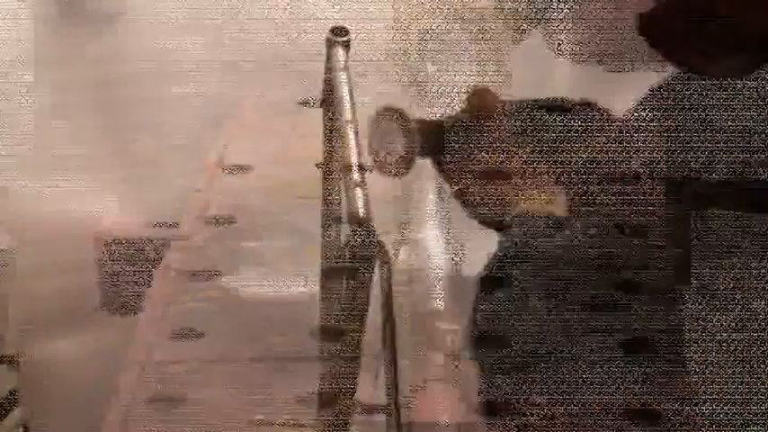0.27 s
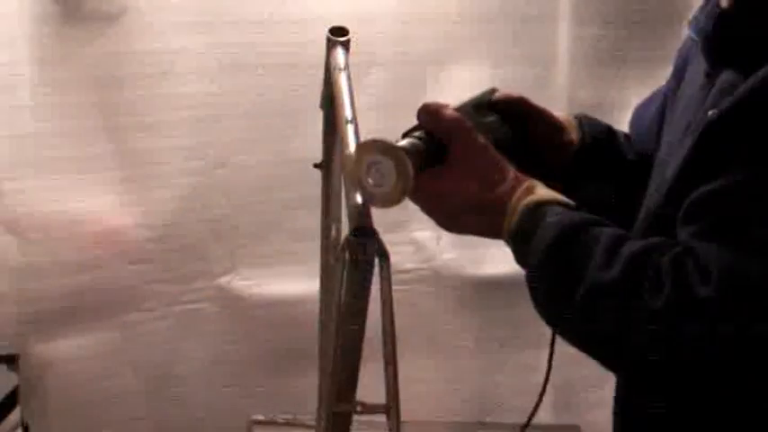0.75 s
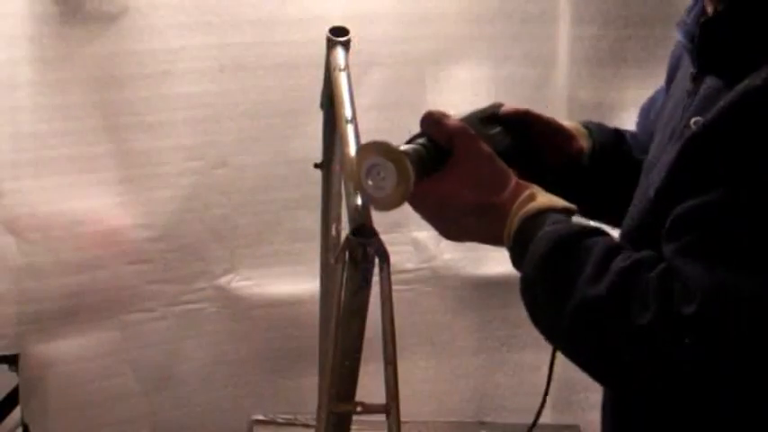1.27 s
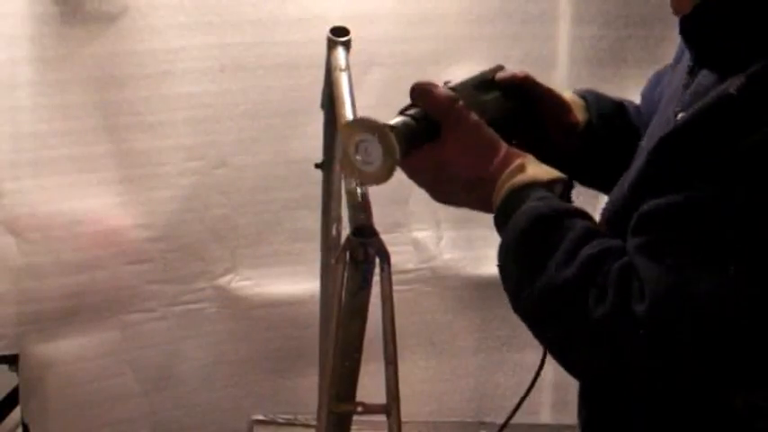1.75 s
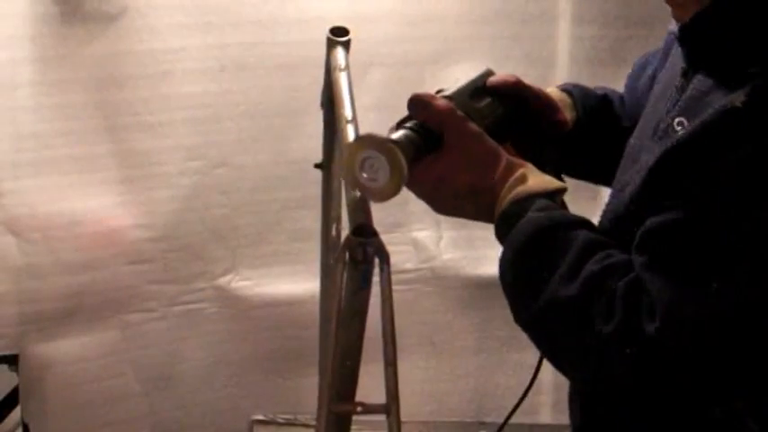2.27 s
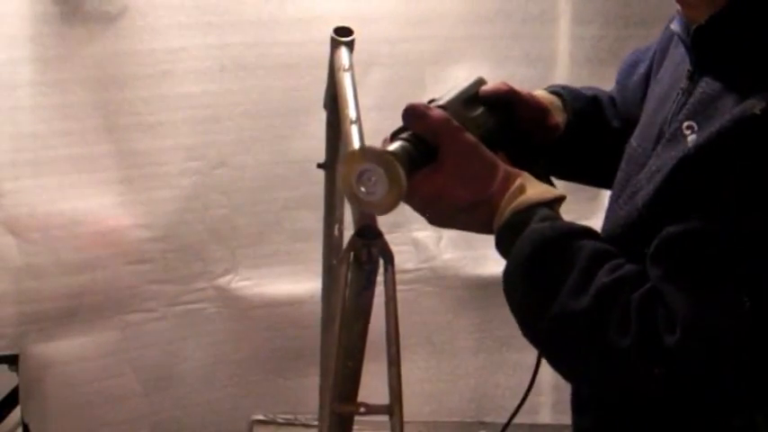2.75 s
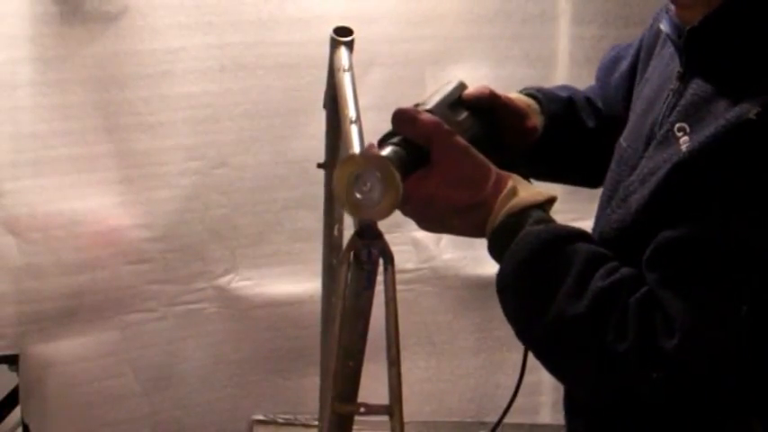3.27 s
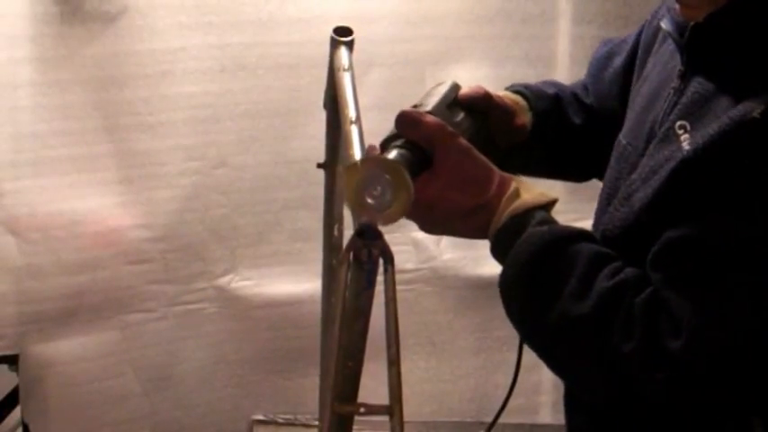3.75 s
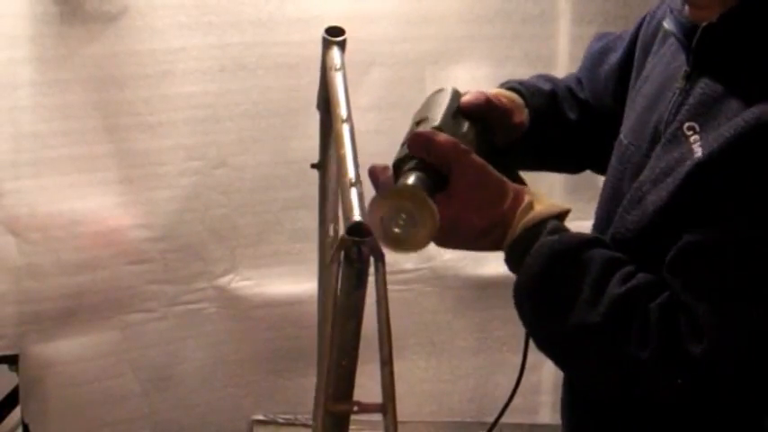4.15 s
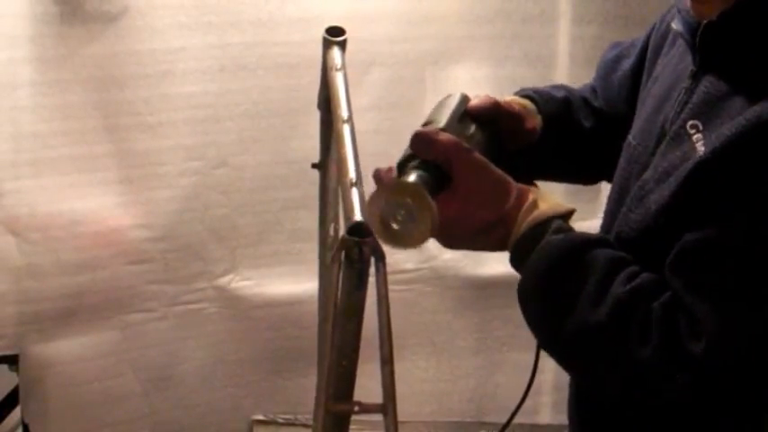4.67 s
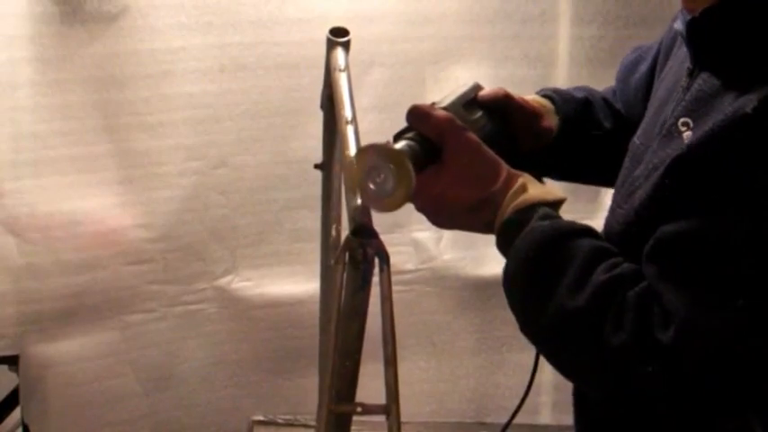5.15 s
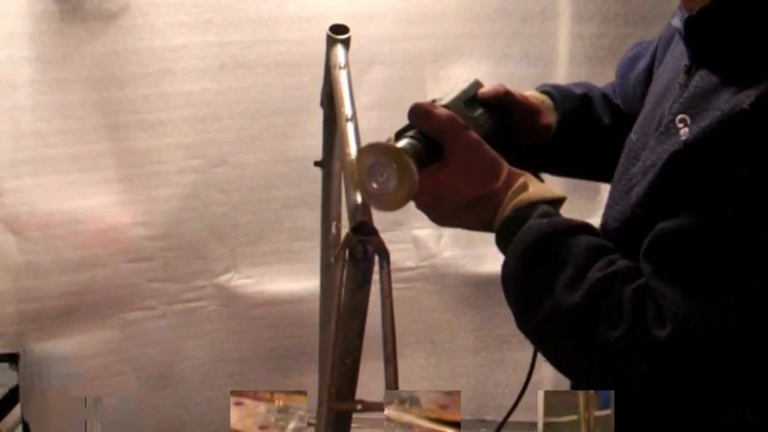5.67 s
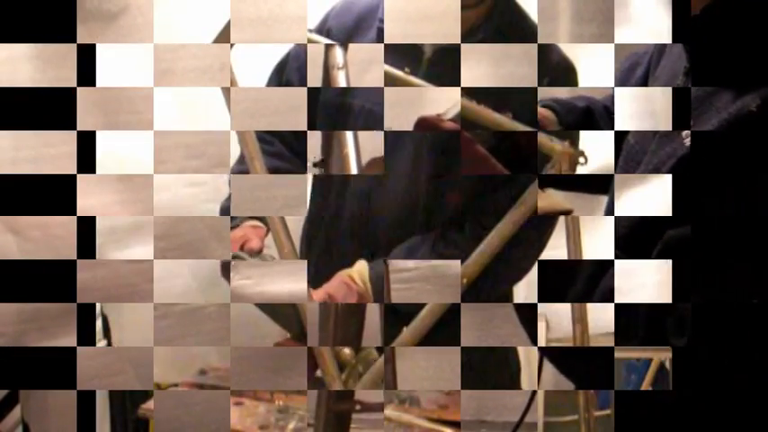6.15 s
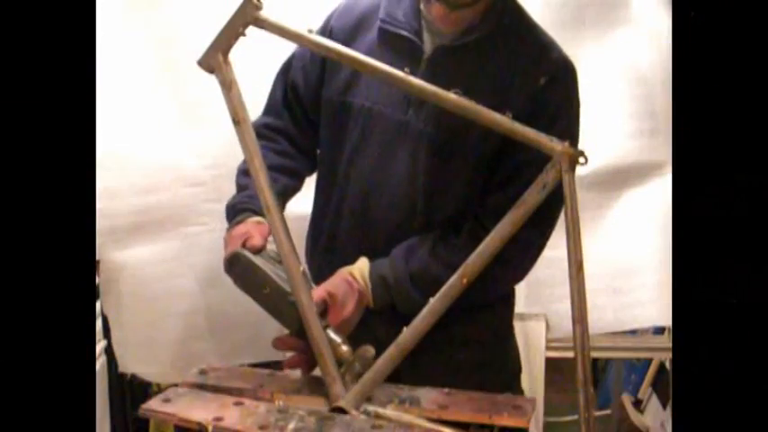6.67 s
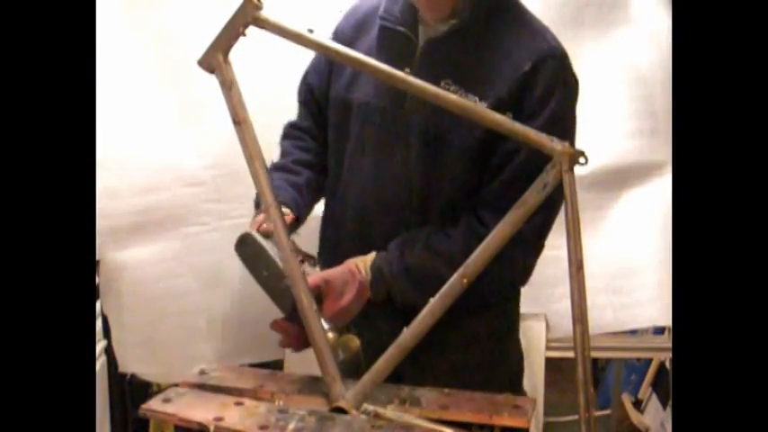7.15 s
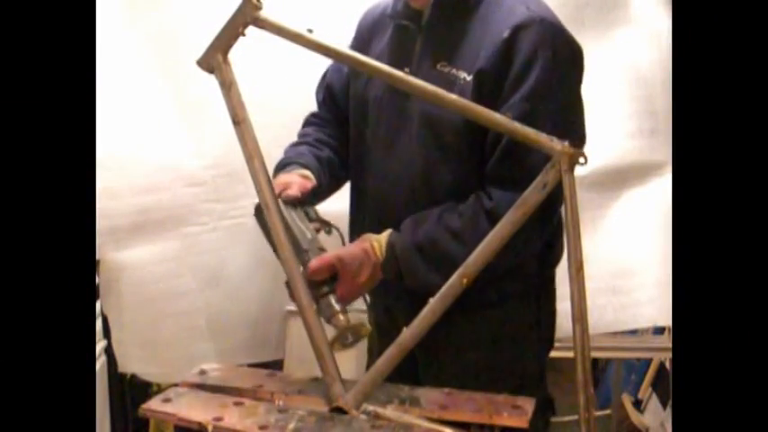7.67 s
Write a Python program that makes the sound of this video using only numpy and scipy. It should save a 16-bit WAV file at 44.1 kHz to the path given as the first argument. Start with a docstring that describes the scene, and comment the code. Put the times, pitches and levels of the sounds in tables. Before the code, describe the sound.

Stereo, fairly close, in a garage: an electric drill drives a wire wheel over thin hollow steel tubes. From 0 s a steady whine near 1.7 kHz with bristle hiss fades almost to silence by 0.65 s. At about 0.67 s a louder stretch springs in abruptly, whine slightly higher, around 1.8 kHz, with strong bright hiss, hollow mid rumble and short tube resonances. From 2.2 s load drags the pitch down, the main whine growing stronger, to its lowest near 3.5 s, about 1.5 kHz; it climbs back partway by 4.5 s and wavers, with roughness, wheel beating and thin high ringing. Between 5.7 and 6.6 s it melts into another pass, two close whines beating. The new tube sounds fuller and drier; pitch rises after 6.7 s, the wheel digs in with a surge at 7.4-7.6 s, then sags, still running at 7.9 s.

```python
"""A drill's whine and the hiss of a wire wheel on thin steel tubes come first, sinking within the first second.
A second stretch springs in abruptly and later melts into a third. The gearbox whines at multiples of the motor
speed; load bends the pitch through resonances of casing and garage, so each line swells and drops.
Bristles hiss and make the frame rumble; ringing bands of tube, frame and garage swell during their spells.
Gain control ducks the loud moments, and all of it shares one upper band limit."""
import sys
import numpy as np
from scipy import signal
from scipy.fft import rfft, irfft, next_fast_len
from scipy.io import wavfile
from scipy.ndimage import uniform_filter1d

SR = 44100
rng = np.random.default_rng(int(sys.argv[2]) if len(sys.argv) > 2 else 0)


def waveform_to_disk(signal):
    """Save audio, clipped to [-1, 1], as 16-bit WAV at the path in sys.argv[1]."""
    frames = np.transpose(np.atleast_2d(signal))
    scaled = np.clip(frames, -1, 1) * 32767
    samples = np.round(scaled).astype(np.int16)
    wavfile.write(sys.argv[1], SR, samples)


N = 348831

# All source levels are set ahead of gain control and fades.
CUT_S, BLEND_S = .665, (5.7, 6.6)  # second stretch starts; second melts into third
WHEEL_RATIO = 4 / 39  # wheel turns per motor turn: four pinion teeth drive a larger gear
RIGHT_LAG_S = 6e-5  # sound reaches the left microphone port first

# How loud each gearbox line arrives at a given motor speed, one table a stretch: speed_turns_per_s,
# mesh_db (at 4 x motor), then first_db, third_db, fifth_db, eighth_db (at 1, 3, 5 and 8 x motor)
FIRST_LINES = [(432.6, -25, -45, -54, -37, -34), (433.8, -28, -50, -55, -34, -45),
               (434.3, -38, -55, -56, -42, -50), (437, -38, -55, -50, -42, -49),
               (437.8, -31, -55, -45, -40, -48)]
SECOND_LINES = [(383.4, -17.5, -37.5, -34, -26, -34), (385.5, -21, -37, -31, -34, -31),
                (389.3, -24, -40.5, -33.5, -33.5, -28), (395.8, -21.5, -41, -27, -28, -32.5),
                (396, -29, -46, -37, -35, -38), (399, -17.5, -54, -40, -37, -31),
                (402.8, -14, -47, -36, -34.5, -38), (408.2, -17, -42, -34, -39, -26),
                (409, -25, -35.5, -36, -45, -28.5), (415.5, -24, -39, -38, -56, -34.5),
                (418.2, -18.5, -38, -31, -36.5, -37.5), (423, -25.5, -42, -28, -31, -31),
                (429, -28, -43, -28, -34, -39), (434, -21.5, -44, -26.5, -30, -36),
                (440, -31, -45, -30, -30, -31), (452.5, -36, -39.5, -49, -40, -38),
                (453.5, -54, -41.5, -36.5, -38.5, -56)]
THIRD_LINES = [(405.5, -24.5, -46, -42, -35, -41), (406.3, -22, -50, -32, -31, -42),
               (414, -26, -43, -30, -37, -37), (414.8, -27.5, -51, -36, -27.5, -33),
               (419.4, -26, -55, -28.5, -40, -37), (422, -32, -58, -36, -33, -33),
               (424, -28.5, -56, -36, -36.5, -38)]
# Wheel run-out beating against the mesh, in the first two stretches and in the third:
# time_s, below_db, above_db (lines one wheel turn either side of the mesh)
EARLY_RUNOUT = [(0, -37, -38), (.7, -52, -52), (2.2, -44, -45), (2.7, -30, -34), (3.1, -45, -40),
                (3.32, -33, -26), (3.55, -42, -37), (3.8, -32, -27), (4.07, -45, -34), (4.4, -31, -39),
                (4.7, -40, -48), (5.0, -23, -34), (5.36, -25, -35), (5.45, -31, -43), (6.1, -42, -46)]
THIRD_RUNOUT = [(6.7, -52, -38)]


def drill(early, late, second, third):
    """Motor and gearbox: casing and garage set each line's level, so the balance shifts with speed."""
    first = np.arange(N) < CUT_S * SR

    def heard_early(hz):
        return np.where(first, columns(FIRST_LINES, hz), columns(SECOND_LINES, hz))

    def heard_late(hz):
        return columns(THIRD_LINES, hz)

    early_whine = second * gearbox(early, heard_early, EARLY_RUNOUT)
    late_whine = third * gearbox(late, heard_late, THIRD_RUNOUT)
    return early_whine + late_whine


SURGE_S, SURGE_DB = (7.4, 7.62), 4  # the wheel digs in: spell, lift of the main lines
SURGE_SECOND_DB = -31.5  # line at 2 x motor while the wheel digs in
SWELL_S, MOVE_S = 0.037, 0.16  # width of a whine swell; time to pass from one spot to the next
SKIRT_DB, SKIRT_HZ = -19, 45  # bristle jolts shake the mesh: rough skirt below its level, and how fast
TOP_WHISTLE, TOP_WHISTLE_DB = 40, -25  # multiple of motor speed, in the band only when load slows the motor
# Brief swells and drops of the main whine: centre_s, change_db
MESH_SWELLS = [(2.84, 3), (2.91, -2), (3.2, 2.5), (3.28, -2), (4.22, 0.5), (4.28, -3), (4.58, -1.5),
               (5.01, -4), (5.33, 0.5), (6.38, -3.5), (6.54, 3)]
# Thin whine at 12 x motor: speed_turns_per_s, level_db
THIN_WHINE = [(382, -48), (392, -40), (397, -34), (403, -40), (418, -36), (422, -33), (440, -41),
              (456, -33)]
# Wheel wobble on each spot it works: start_s, second_db, third_db, fourth_db, sixth_db
# (levels at 2, 3, 4 and 6 per wheel turn)
WHEEL_WOBBLE = [(0, -48.5, -79, -56, -56.5), (.665, -75, -76, -73, -60), (2.1, -64.5, -62, -66, -64),
                (2.85, -66.5, -71, -70, -56), (3.6, -62, -71, -66, -63), (4.05, -58, -54, -63, -60),
                (4.55, -63, -63, -66, -57), (5.2, -69, -61, -66, -55), (5.5, -63, -60, -61, -58),
                (6.3, -73, -75, -60, -49), (7.0, -76, -75, -57.5, -55), (7.65, -73, -75, -63, -46.5)]


def gearbox(hz, heard, runout):
    """Four pinion teeth mesh per turn; rotor and wheel run-out add sidebands; heard(hz) gives line levels."""
    turns = np.cumsum(hz) / SR
    t = np.arange(N) / SR
    surge = np.clip(np.minimum(t - SURGE_S[0], SURGE_S[1] - t) / .04, 0, 1)
    mesh_db, rotor_db, *others_db = np.add(heard(hz), SURGE_DB * surge)
    swells_db = sum(db * np.exp(-((t - s) / SWELL_S) ** 2) for s, db in MESH_SWELLS)

    # each line: multiple of motor speed, level in dB, wavering share
    lines = [(4, mesh_db + swells_db, 0.03), (1, rotor_db, 0.11)]
    for k, db in zip((3, 5, 8), others_db):
        lines.append((k, db, .15 if k < 6 else .25))
    for k, db in zip((4 - WHEEL_RATIO, 4 + WHEEL_RATIO), columns(runout, t)):
        lines.append((k, db, .1))
    # high partials reach the ports mostly by reflection and waver more
    lines.append((12, columns(THIN_WHINE, hz)[0], .4))
    lines.append((2, SURGE_SECOND_DB - 40 * (1 - surge), .15))

    start, *wobble_db = np.transpose(WHEEL_WOBBLE)
    spot = np.maximum(np.searchsorted(start, t, "right") - 1, 0)
    for k, db in zip((2, 3, 4, 6), wobble_db):
        moving_db = uniform_filter1d(db[spot], int(MOVE_S * SR) + 1)
        lines.append((k * WHEEL_RATIO, moving_db, .18))

    speed = hz.mean()
    whine = sum(tone(k * turns, k * speed, db, fuzz, 9.4) for k, db, fuzz in lines)
    skirt = tone(4 * turns, 4 * speed, mesh_db + SKIRT_DB, 1, SKIRT_HZ)
    whistle = tone(TOP_WHISTLE * turns, TOP_WHISTLE * speed, TOP_WHISTLE_DB, 0.51, 30.)
    return whine + skirt + whistle


# Motor speed, one table a stretch; load from the wheel sags it: time_s, speed_turns_per_s
FIRST_SPEED = [(0, 432.5), (0.3, 434), (0.66, 442)]
SECOND_SPEED = [(.66, 456), (1.5, 456), (1.85, 451.7), (2.15, 450), (2.4, 434), (2.6, 421.5), (2.71, 417.5),
                (2.83, 406), (3.05, 402.6), (3.2, 403), (3.3, 397.4), (3.4, 385.8), (3.5, 380.4),
                (3.57, 382.5), (3.65, 388.5), (3.96, 393.5), (4.12, 400.3), (4.27, 411.2), (4.48, 418.5),
                (4.57, 415.8), (4.93, 418.5), (5.0, 415.2), (5.15, 418.8), (5.42, 421.4), (5.64, 418.5),
                (5.85, 416.2), (6.6, 414.5)]
THIRD_SPEED = [(5.7, 405.5), (5.9, 404), (6.1, 405), (6.25, 409.5), (6.48, 411), (6.68, 407.3),
               (6.9, 416.8), (7.15, 420.2), (7.4, 427.3), (7.5, 425.6), (7.7, 416.2), (7.85, 417.5),
               (7.91, 416)]


def motor_speed():
    """Turns per second under load: one row for the first two stretches, one for the third."""
    t = np.arange(N) / SR
    early = np.where(t < CUT_S, columns(FIRST_SPEED, t)[0], columns(SECOND_SPEED, t)[0])
    return np.array([early, columns(THIRD_SPEED, t)[0]])


DIP_S = 0.04  # width of a brushing dip
# Brushing level: time_s, hiss_db (bristles), rumble_db (frame)
BRUSH_LEVELS = [(0, -18.5, -30.5), (0.66, -17, -29), (0.67, -12, -25), (1.16, -12.5, -28.5),
                (1.56, -13, -25.5), (1.74, -10.5, -25.5), (2.1, -13.5, -28), (2.5, -13.5, -29),
                (3, -16, -33.5), (3.5, -15.5, -32), (4, -13.5, -29), (4.42, -14.5, -29),
                (4.8, -14.5, -30.5), (5.42, -14, -30), (6.2, -16, -30.5), (6.9, -15.5, -27),
                (7.91, -13.5, -29)]
# Brief dips in the brushing: centre_s, change_db
BRUSH_DIPS = [(1.82, -3), (2.06, -1.5)]
# Relative colour of the bristle hiss: frequency_hz, level_db (per Hz)
HISS_COLOUR = [(600, -36.5), (1000, -20), (1300, -4), (2000, -5.5), (3200, -4.5), (4300, -6), (7800, -4),
               (9200, -2), (11100, -4), (15200, -5.5), (15750, -12)]
# Relative colour of the frame rumble in the first two stretches: frequency_hz, level_db (per Hz)
RUMBLE_COLOUR = [(15, -70), (25, -51), (123, -36), (244, -9), (285, -24.5), (368, 0), (444, -12),
                 (484, -3.5), (928, 1), (1500, -8), (1950, -34), (3300, -120)]
# The same for another tube, in the third stretch: frequency_hz, level_db (per Hz)
THIRD_RUMBLE_COLOUR = [(15, -64), (25, -29), (168, -28), (201, -31), (251, -16), (433, -10), (667, 1.5),
                       (1150, -3.5), (1500, -17), (2530, -120)]


def brush(turns, third):
    """Thousands of bristle tips a second blur to hiss; the uneven wheel and motor throb through it."""
    t = np.arange(N) / SR
    hiss_db, rumble_db = columns(BRUSH_LEVELS, t)
    wheel_throb = 0.011 * np.cos(2 * np.pi * WHEEL_RATIO * turns)
    motor_throb = 0.054 * np.cos(2 * np.pi * turns)
    snags = gain_of(0.56 * drift(14.0).real)  # the hand's pressure shakes
    dips = gain_of(sum(db * np.exp(-((t - s) / DIP_S) ** 2) for s, db in BRUSH_DIPS))
    early_rumble = np.sqrt(1 - third ** 2) * noise(RUMBLE_COLOUR, .8, 2.4)
    late_rumble = third * noise(THIRD_RUMBLE_COLOUR, .5, 2.2)
    hiss = gain_of(hiss_db) * noise(HISS_COLOUR, 0.81, 2.48)
    rumble = gain_of(rumble_db) * (early_rumble + late_rumble)
    roar = (1 + wheel_throb + motor_throb) * snags * dips * (hiss + rumble)
    return (1 - third) * garage(roar) + third * roar


RING_FUZZ = 0.85  # share of a high band that wavers
WIDE_BELOW_HZ = 2000  # bands up to here are all wavering, with no steady core
# Narrow and broad ringing bands of tube, frame and garage, each swelling during its spells:
# pitch_hz, width_hz, level_db, spells (pairs of start_s, end_s)
RINGING_BANDS = [(235, 40, -50, [(.67, 1.8)]), (345, 50, -42, [(1.2, 2.2)]), (930, 50, -33, [(.67, .9),
                 (1.2, 1.35), (1.45, 1.7), (1.92, 2.03)]), (1162, 24, -36, [(.75, .95), (1.08, 1.25),
                 (1.4, 1.75)]), (5264, 34, -29, [(2.2, 2.6), (2.72, 2.84), (4.88, 5.22), (5.38, 5.73)]),
                 (9065, 30, -35, [(3.6, 4), (6.8, 7.95)]), (9050, 600, -28, [(3.6, 4), (6.8, 7.95)]),
                 (11005, 40, -28.5, [(.7, 1.35), (2.1, 2.55), (5.2, 5.65)]), (11520, 50, -37, [(.9, 1.4),
                 (2.1, 2.6), (5.1, 5.8)]), (13660, 40, -35, [(6.5, 7.1), (7.4, 7.95)]),
                 (14188, 50, -32.5, [(2.2, 2.9), (4.35, 5.05), (5.3, 6.1), (6.6, 7), (7.3, 7.7)])]


def ringing():
    """Wavering tones make narrow and broad ringing bands of tube, frame and garage that swell in and out."""
    t = np.arange(N) / SR
    out = np.zeros((2, N))
    for hz, width, db, spells in RINGING_BANDS:
        swell = sum(np.clip(np.minimum(t - start, end - t) / 0.017, 0, 1) for start, end in spells)
        fuzz = RING_FUZZ if hz > WIDE_BELOW_HZ else 1
        out += swell * tone(hz * t, hz, db, fuzz, width / 2)
    return out


# Standing waves of garage and frame in the first two stretches:
# pitch_hz, width_hz, change_db (below zero a null)
GARAGE_MODES = [(381, 20, 2.5), (486, 25, -5), (804, 21, 5.5), (948, 27, 3), (995, 55, -3.5),
                (1157, 35, 5.5), (1230, 26, -7), (1410, 23, -4.5), (1540, 32, -7.5)]


def garage(x):
    """Standing waves lay narrow peaks and nulls over the brushing."""
    size = next_fast_len(N)
    hz = np.fft.rfftfreq(size, 1 / SR)
    colour_db = sum(db / (1 + (2 * (hz - f) / width) ** 2) for f, width, db in GARAGE_MODES)
    return irfft(rfft(x, size) * gain_of(colour_db), size)[:, :N]


# Stereo image of tones and noise: frequency_hz, likeness (left to right, 0 to 1)
LIKENESS = [(60, 0.74), (450, 0.85), (1400, 0.86), (2400, 0.31), (3500, 0.31), (8500, 0.23), (11700, 0.19),
            (14000, 0.58)]
# Stereo balance of tones and noise: frequency_hz, left_minus_right_db
BALANCE = [(60, -3.5), (240, -3.0), (950, -3), (3770, -1), (15000, -0.5)]


def tone(turns, hz, db, fuzz, rate_hz):
    """A partial at both ports: a steady part, late on the right, and a partly shared wavering reflection."""
    lag = np.exp(-2j * np.pi * hz * RIGHT_LAG_S * np.array([[0], [1]]))
    side = gain_of(read(BALANCE, hz) * np.array([[.5], [-.5]]))
    share = np.clip(fuzz, 0, 1)
    same = np.clip(read(LIKENESS, hz), 0, 1) ** 2
    left, own = drift(rate_hz, channels=2)
    right = same * left * lag[1] + np.sqrt(1 - same ** 2) * own
    shape = np.sqrt(1 - share) * lag + np.sqrt(share) * np.array([left, right])
    wave = (shape * np.exp(2j * np.pi * (turns + rng.random()))).real
    return np.sqrt(2) * gain_of(db) * side * wave


def noise(spectrum, patchy_db, streaky_db):
    """Random short-time spectra: broad patches, and narrow streaks where crowded tube modes come and go."""
    hz = np.fft.rfftfreq(1024, 1 / SR)
    a, b, c, d, patches, streaks = rng.standard_normal((N // 256 + 5, len(hz), 6)).T
    # axis 0 is frequency, axis 1 is time
    patches = uniform_filter1d(uniform_filter1d(patches, size=24, axis=0), size=14, axis=1)
    streaks = uniform_filter1d(streaks, size=40, axis=1)
    same = np.clip(read(LIKENESS, hz), 0, 1)[:, None]
    late = np.exp(-2j * np.pi * hz * RIGHT_LAG_S)[:, None]
    left = a + 1j * b
    right = same * late * left + np.sqrt(1 - same ** 2) * (c + 1j * d)
    z = np.array([left, right])
    z *= gain_of(read(BALANCE, hz)[:, None] * np.array([.5, -.5])[:, None, None])
    z *= gain_of(read(spectrum, hz)[:, None] + patchy_db * evened(patches) + streaky_db * evened(streaks))
    return evened(signal.istft(z, nperseg=1024, noverlap=768)[1][:, :N])


def drift(rate_hz, channels=1):
    """Slow complex chance of about unit power: noise through two equal one-pole low-passes."""
    a, b = rng.standard_normal((2, channels, N // 64 + 2))  # one draw every 64 samples
    r = np.exp(-2 * np.pi * rate_hz * 64 / SR)
    slow = signal.lfilter([1 - r], [1, -r], a + 1j * b)
    slow = signal.lfilter([1 - r], [1, -r], slow)
    slow = slow / np.sqrt(np.mean(abs(slow) ** 2))
    return np.array([np.interp(np.arange(N) / 64, np.arange(slow.shape[1]), c) for c in slow])


def gain_of(db):
    """Decibels to an amplitude factor."""
    return 10 ** (np.asarray(db) / 20)


def evened(x):
    """Scale to unit RMS."""
    return x / np.sqrt(np.mean(x ** 2) + 1e-20)


def read(points, hz):
    """Spectrum points joined on a log-frequency axis."""
    f, value = np.transpose(points)
    return np.interp(np.log(hz + 1), np.log(f + 1), value)


def columns(rows, at):
    """Each further column of a curve table, read at values of its first column."""
    x, *rest = np.transpose(rows)
    return [np.interp(at, x, c) for c in rest]


def overlap():
    """Share of the third stretch, and the level of two unrelated sounds that cross on straight lines."""
    fade = np.interp(np.arange(N) / SR, BLEND_S, (0, 1))
    return fade, np.hypot(fade, 1 - fade)


def scene():
    """Drill, brush and ringing; while two stretches overlap, their two motor pitches beat."""
    early, late = motor_speed()
    fade, blend = overlap()
    # record() applies the blend level to everything, so it is divided out here
    second = (1 - fade) / blend
    third = np.minimum(fade / blend, 1)
    return drill(early, late, second, third) + brush(np.cumsum(early) / SR, third) + ringing()


DUCK_SHARE, DUCK_FROM_DB, DUCK_S = 0.58, -15.5, .06  # share of the excess taken away, threshold, smoothing
FADE_END_S, FADE_BEND = 0.72, 1.11  # the first stretch sinks towards silence: end point, curve exponent
FADE_IN_S = 0.016  # the second stretch springs in
EDGE_HZ = 15800  # upper band limit


def record(dry):
    """Gain control on the smoothed power, the fades between the stretches, the band limit."""
    t = np.arange(N) / SR
    span = int(DUCK_S * SR) + 1
    power = abs(uniform_filter1d((dry ** 2).mean(0), span))
    power_db = 10 * np.log10(power + 1e-12)
    excess_db = uniform_filter1d(np.maximum(power_db - DUCK_FROM_DB, 0), span)
    ducked = dry / gain_of(DUCK_SHARE * excess_db)
    fade_out = np.clip(1 - t / FADE_END_S, 0, 1) ** FADE_BEND
    fade_in = np.clip((t - CUT_S) / FADE_IN_S, .03, 1)
    fades = np.where(t < CUT_S, fade_out, fade_in)
    low_pass = signal.firwin(1023, EDGE_HZ, window=("kaiser", 9), fs=SR)
    return signal.oaconvolve(ducked * fades * overlap()[1], low_pass[None], "same")


dry = scene()
out = record(dry)
waveform_to_disk(out)
```